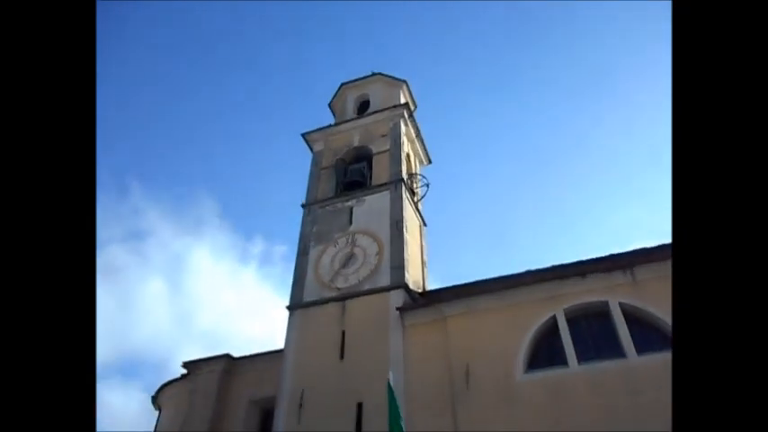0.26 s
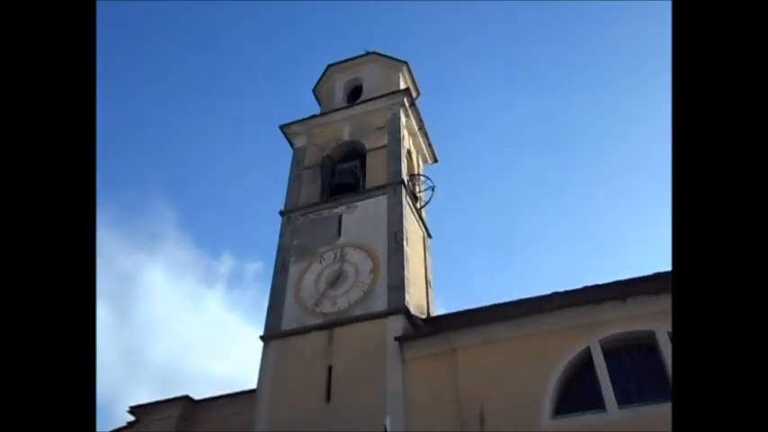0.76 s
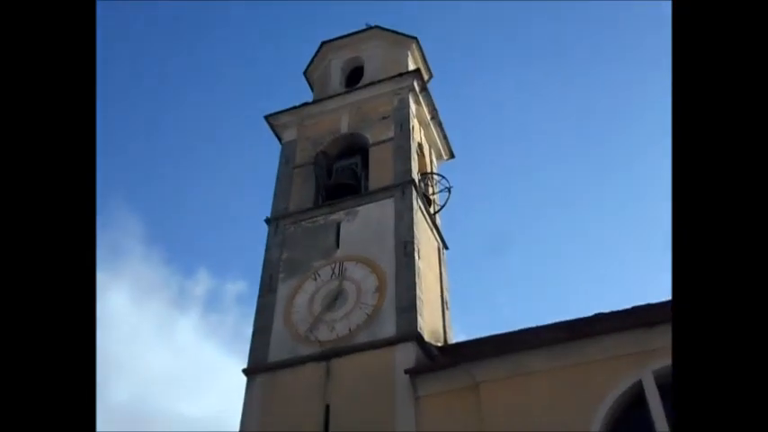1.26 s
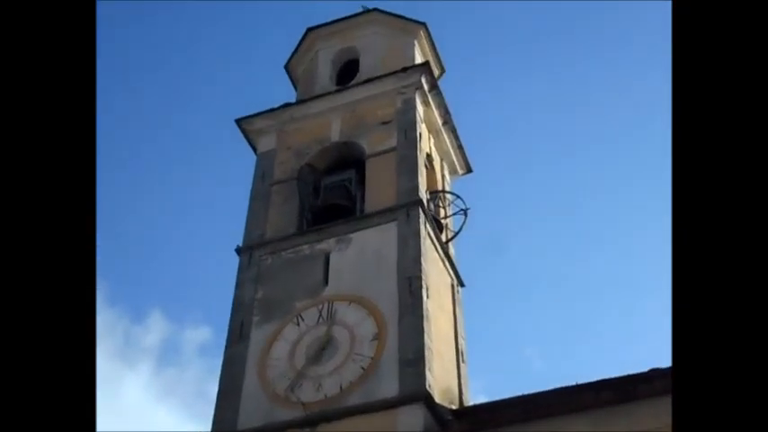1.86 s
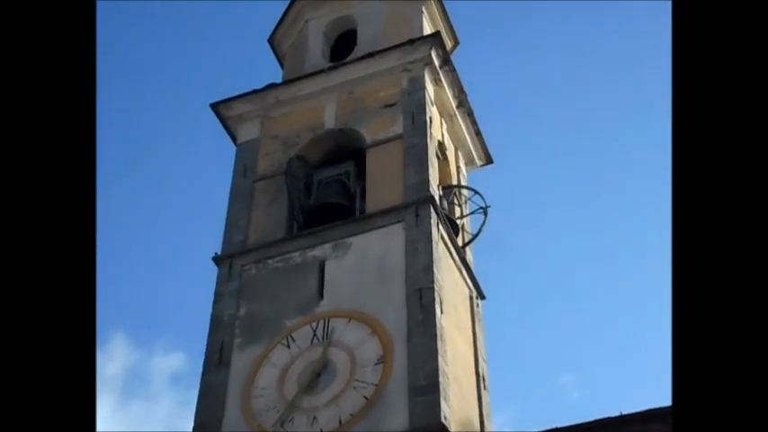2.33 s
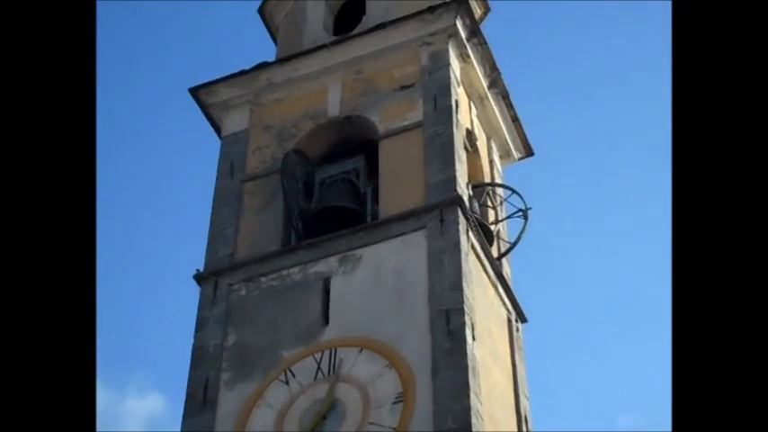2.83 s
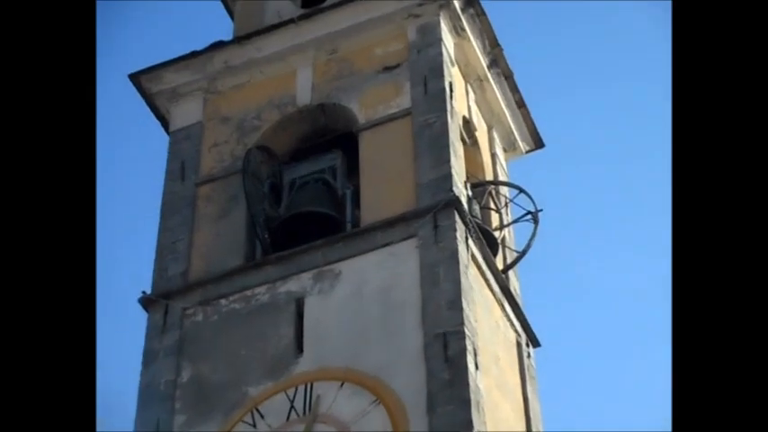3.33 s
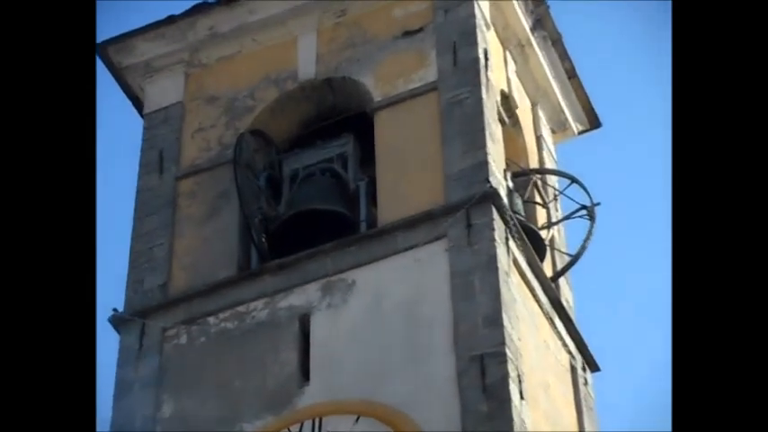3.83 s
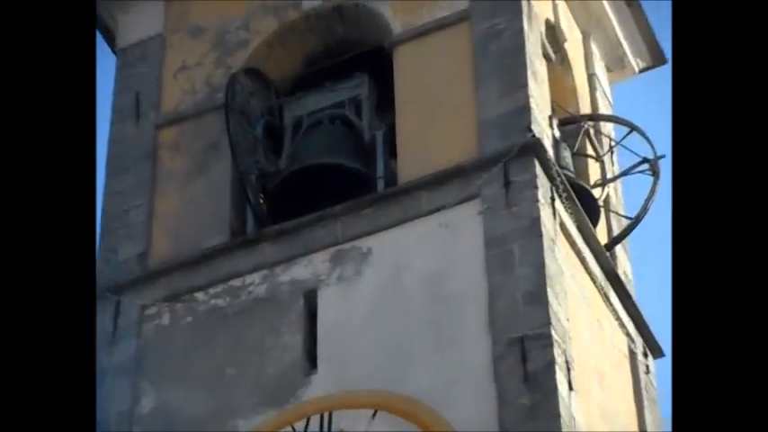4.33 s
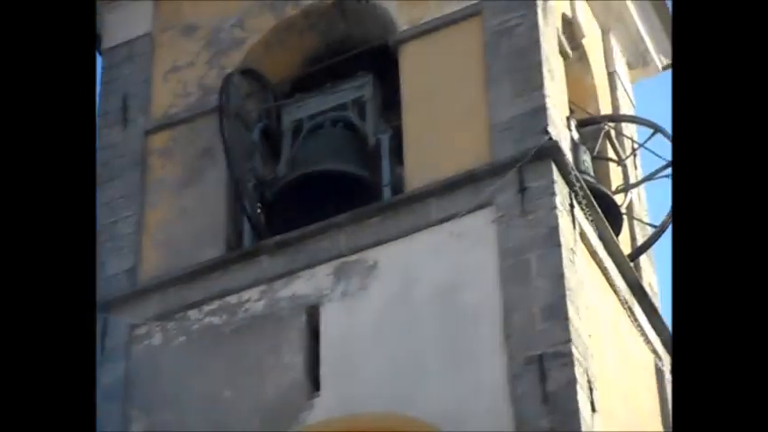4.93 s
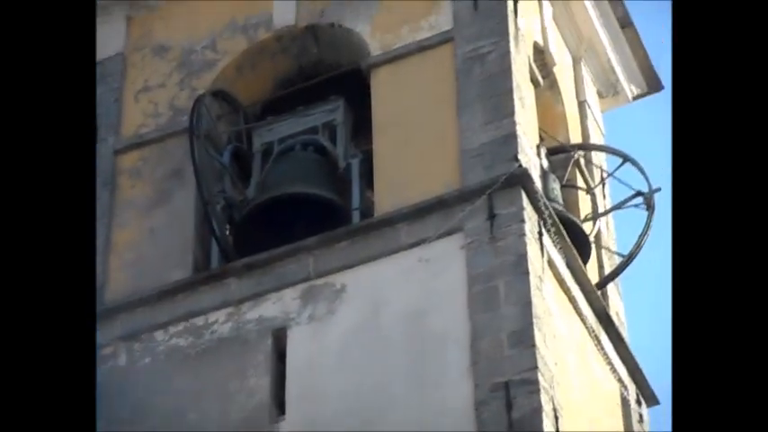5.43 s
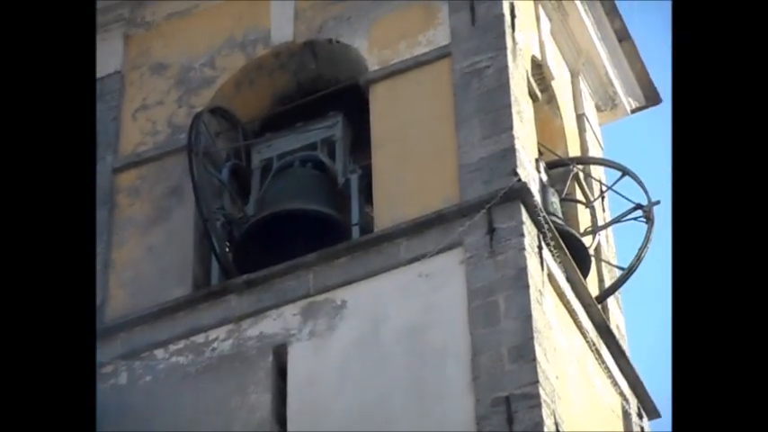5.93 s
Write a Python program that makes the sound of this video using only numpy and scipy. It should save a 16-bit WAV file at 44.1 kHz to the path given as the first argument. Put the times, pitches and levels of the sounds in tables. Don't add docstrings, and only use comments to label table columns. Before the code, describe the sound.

A small camera zoom motor whirs and rattles close up with irregular hollow ticks, stops, then a sharp plastic snap and fiddly finger clicks outdoors.

```python
import sys
import numpy as np
from scipy import signal
from scipy.fft import rfft, irfft, dct, next_fast_len
from scipy.io import wavfile
from scipy.ndimage import uniform_filter1d

SR = 44100
rng = np.random.default_rng(int(sys.argv[2]) if len(sys.argv) > 2 else 0)


def nominal_scale(level):
    x = np.asarray(level, float) / 20
    return 10 ** x


def generate_wav(signal):
    frames = np.transpose(np.atleast_2d(signal))
    scaled = np.clip(frames, -1, 1) * 32767
    pcm = np.round(scaled).astype(np.int16)
    wavfile.write(sys.argv[1], SR, pcm)


N = 272538


def level(x, db):
    return x * nominal_scale(db) / np.sqrt(np.mean(x ** 2))


def resonate(x, peaks):
    total = 0
    for k, (hz, width, db) in enumerate(peaks):
        b, a = signal.iirpeak(hz, hz / width, fs=SR)
        total = total + (-1) ** k * nominal_scale(db) * signal.lfilter(b, a, x)
    return total


def walk(rate):
    k = int(SR / rate)
    held = np.repeat(rng.standard_normal(N // k + 1), k)
    return 1.261 * uniform_filter1d(uniform_filter1d(held, k), k)[:N]


def add(out, s, y):
    i = int(s * SR)
    out[i:i + len(y)] += y[:N - i]


def ring(modes, chance, spread=.06, scatter_db=1.5):
    t = np.arange(4096) / SR
    y = 0
    for (hz, t60, db), louder, sharper in zip(modes, chance[:5], chance[5:]):
        tone = np.sin(2 * np.pi * hz * (1 + spread * sharper) * t)
        y = y + nominal_scale(db + scatter_db * louder) * tone * np.exp(-np.log(1000) * t / t60)
    y = -y * (1 - np.exp(-(t / 0.0003) ** 2))
    return y / np.max(np.abs(y))


def slam(modes, scrape_s):
    t = np.arange(4096) / SR
    y = 0
    for (hz, t60, db), phase_turns in zip(modes, 0.33 * rng.random(len(modes))):
        tone = np.sin(2 * np.pi * (hz * t + phase_turns))
        y = y + nominal_scale(db) * tone * np.exp(-np.log(1000) * t / t60)
    y = y * (1 - np.exp(-(t / scrape_s) ** 2))
    return y / np.max(np.abs(y))


# frequency in Hz, density in dB per Hz.
AIR_COLOUR = [(35, -33), (60, -15), (250, -9.5), (850, -2.5), (1150, -2), (1600, -7), (4500, -11),
              (10300, -28)]
# frequency in Hz, start in seconds, level in dB.
FAR_HUM = (250, 5.62, -75)
AIR_DB, AIR_SWELL_DB = -56, -1.02


def air():
    t = np.arange(N) / SR
    hz, db = np.transpose(AIR_COLOUR)
    f = np.maximum(np.fft.rfftfreq(N, 1 / SR), 1)
    colour = nominal_scale(np.interp(np.log(f), np.log(hz), db))
    hiss = irfft(rfft(rng.standard_normal(N)) * colour, N)
    swell = nominal_scale(AIR_DB + AIR_SWELL_DB * walk(1.38) + 0.46 * walk(5.3))
    hum_hz, hum_start_s, hum_db = FAR_HUM
    hum = np.sqrt(2) * nominal_scale(hum_db + 2.3 * walk(6.32)) * np.sin(2 * np.pi * hum_hz * t)
    return level(hiss, 0) * swell + hum * np.clip((t - hum_start_s) / 0.053, 0, 1)


# frequency in Hz, width in Hz, level in dB.
RUB_COLOUR = [(1500, 1000, -7.5), (2710, 380, 4.5), (4000, 1050, -1.5), (6200, 1450, -4.5), (7260, 500, -1),
              (8750, 600, -7.5)]
# touch in seconds, lift in seconds, level at the lift in dB.
STROKES = [
    (5.23, 5.477, -49.5),
    (5.69, 5.71, -64),
    (5.813, 5.93, -76),
    (5.98, 6.035, -56.5),
    (6.08, 6.2, -69),
]
PRESS_DB_PER_S, TOUCH_DB_PER_S, LIFT_DB_PER_S = 42, 280, 160


def rubbing():
    t = np.arange(N) / SR
    burstiness = np.minimum(rng.exponential(size=N), 6)
    grains = rng.standard_normal(N) * nominal_scale(3.7 * burstiness + 1.4 * walk(60))
    effort = 0
    for touch, lift, db in STROKES:
        press_db = db - PRESS_DB_PER_S * np.maximum(lift - t, 0)
        fade_db = TOUCH_DB_PER_S * np.maximum(touch - t, 0) + LIFT_DB_PER_S * np.maximum(t - lift, 0)
        effort = effort + nominal_scale(press_db - fade_db)
    return level(resonate(grains, RUB_COLOUR), -0.95) * effort


# frequency in Hz, width in Hz, level in dB.
SHELL = [(1870, 160, -4.5), (2300, 150, -0.5), (3120, 1200, -8.5), (4030, 680, -3), (4420, 310, -2.5),
         (5100, 1560, -10)]
SHELL_TOP = [(6800, 2500, -2.5), (7660, 1200, -0.5), (9100, 1200, -13.5)]
SHELL_LOW = [(344, 220, -9), (670, 170, -2), (820, 170, 8), (1170, 930, 9.5)]


def snap(db, hz, low_db, top_db, ms, noise, tail_db=-24, tail_s=0.006):
    t = np.arange(len(noise)) / SR
    span = t / (max(ms, .1) / 1000)
    after_rattle = nominal_scale(tail_db) * np.minimum(span, 1) * np.exp(-t / tail_s)
    burst = noise * (span * np.exp(-span ** 1.29) + after_rattle)
    spot = resonate(resonate(burst, SHELL), [(hz, 0.81 * hz, 0)])
    low = resonate(resonate(burst, SHELL_LOW), [(900, 600, 0)])
    top = resonate(resonate(burst, SHELL_TOP), [(7860, 3800, 0)])
    parts = (spot, 0), (low, low_db + 4.5), (top, top_db + 6.0)
    return sum(nominal_scale(db + rel_db) * part / np.max(np.abs(part)) for part, rel_db in parts)


# start in seconds, level in dB, centre in Hz,
# low part in relative dB, top part in relative dB.
CLICKS = [(4.345, -29, 2970, -34, -10), (4.7337, -44, 3100, -22, -12), (4.8862, -48, 2690, -1, -6),
          (4.956, -36, 3700, -25, -13.5), (4.982, -35.5, 2020, -24, -21), (5.0876, -25.5, 3340, -11, -30),
          (5.0982, -46, 1870, -11, 0), (5.141, -44, 1510, -14, -9), (5.144, -32.5, 5220, -28, -11),
          (5.154, -27.5, 4300, -4, -2), (5.233, -43.5, 2470, -9, -10), (5.3222, -42.5, 2580, -23, -7),
          (5.353, -42, 4040, -23, -10), (5.377, -42.5, 2650, -5, -17), (5.402, -35.5, 5600, -26, -1),
          (5.466, -38.5, 2680, -13, -13), (5.661, -41, 1500, -6, -14), (5.674, -52, 6000, -25, -6),
          (5.6819, -35, 3000, -10, -6.5), (5.733, -56, 6000, -25, -8), (5.777, -56, 6500, -25, -12),
          (5.958, -52, 6500, -25, -2), (6.008, -45, 3500, -8, -13), (6.036, -45, 3000, -15, -10),
          (6.041, -25.5, 3250, -14.5, -19)]
CHATTER_MS = 0.59


def clicks():
    out = np.zeros(N)
    for (s, *row), noise in zip(CLICKS, rng.standard_normal((len(CLICKS), 2048))):
        add(out, s - .0003, snap(*row, CHATTER_MS, noise))
    return out


# frequency in Hz, 60 dB decay in seconds, level in dB.
LEVER = [(259, 0.05, -36), (616, 0.037, -33), (810, 0.028, -19), (1130, 0.010, -1.5), (1605, 0.0093, -2.5),
         (2000, 0.0086, -14), (2864, 0.0088, 3), (3145, 0.0076, 9.5), (4470, 0.0063, 10), (5510, 0.0069, 3),
         (6920, 0.0056, 2), (8170, 0.0054, -5), (8970, 0.0056, -9), (10010, 0.0057, -9)]
CASE = [(1500, .06, -34), (2415, 0.06, -27), (2500, .06, -36), (2830, 0.066, -36), (4020, 0.064, -48),
        (4530, 0.083, -46), (7750, 0.045, -34.5), (6280, 0.0067, -12), (7370, 0.0065, -9)]
CATCH = [(1870, 0.0087, -14), (2580, 0.013, -6.5), (3040, 0.018, -9.5), (3790, 0.0055, -1),
         (4500, 0.0062, 2), (4810, 0.024, -16.5), (5360, 0.0056, 4), (6280, 0.0049, 2), (7200, 0.0047, -1),
         (8350, 0.0045, -3), (9400, 0.0045, -6)]
LEVER_S, LEVER_DB = 4.8356, -3
CATCH_S, CATCH_DB = 3.9106, -16


def lever():
    out = np.zeros(N)
    add(out, LEVER_S, nominal_scale(LEVER_DB) * slam(LEVER + CASE, 0.0017))
    crack = snap(-14.5, 3340, -19.5, -15, 1.95, rng.standard_normal(4096), tail_db=-29.5, tail_s=0.0092)
    add(out, LEVER_S, crack)
    thud = ring([(60, 0.058, 3), (140, .04, -9)], rng.standard_normal(10))
    add(out, LEVER_S + 0.00264, nominal_scale(-38.0) * thud)
    add(out, CATCH_S, nominal_scale(CATCH_DB) * slam(CATCH, 0.00077))
    return out


# frequency in Hz, 60 dB decay in seconds, level in dB.
HOLLOW = [(638, 0.01, -2), (854, 0.016, -1), (1054, 0.011, 9), (1517, 0.0067, 7)]
WALL = [(2300, 0.0036, 12), (1980, 0.0094, -9), (2680, 0.0095, -0.5), (3170, 0.0071, 0),
        (3450, 0.0052, -2.5)]
THUMP = [(106, 0.05, -11), (168, 0.024, -2), (321, 0.015, 5)]
PING = [(2600, 0.0081, 3), (2250, 0.0067, -4), (3050, 0.0054, -12), (1050, 0.01, -8), (1610, .006, -15)]
# start in seconds, hollow knock in dB, wall in relative dB, hollow in Hz, wall in Hz.
SLIPS = [(0.358, -37.5, 4, 1050, 2120), (0.549, -30.5, -7.5, 970, 2000), (0.657, -36.5, 5.5, 1100, 2220),
         (0.822, -35, 1, 1060, 2150), (0.982, -38.5, 12, 960, 2400), (1.126, -31, 5, 970, 2250),
         (1.243, -30.5, 5, 1030, 2360), (1.312, -34.5, 5.5, 1090, 2250), (1.401, -31, 2, 1070, 2310),
         (1.538, -30.5, 1.5, 1025, 2250), (1.633, -33, 3.5, 1040, 2370), (1.738, -28.5, -1, 1090, 2340),
         (1.815, -28.5, -1.5, 990, 2390), (1.86, -29.5, -0.5, 1065, 2300), (1.897, -29.5, 0, 1110, 2300),
         (1.949, -38, -3, 1050, 2400), (2.027, -34, -1.5, 1210, 2250), (2.078, -36, 2.5, 1060, 2250),
         (2.143, -36, -1, 1060, 2400), (2.19, -35.5, -2, 990, 2400), (2.441, -31, 1.5, 1010, 2300),
         (2.587, -31, -0.5, 860, 2250), (2.688, -29.5, -4.5, 910, 2550), (2.78, -29, -9, 940, 2550),
         (2.853, -29, -4.5, 905, 2500), (2.902, -32.5, -6, 880, 2570), (2.943, -35.5, -11, 900, 2500),
         (4.559, -29.5, -5, 820, 2240)]
# start in seconds, hollow knock in dB, wall in relative dB, thump in dB.
KNOCKS = [(0.076, -43.5, -19, -70), (0.579, -40, -15, -69), (0.608, -41.5, -14, -75), (0.635, -45, -3, -76),
          (0.698, -40, -16, -67), (0.745, -41.5, -13, -78), (2.609, -38, -8, -72), (2.974, -37, -19, -65),
          (3.464, -40.5, -0.5, -59), (3.638, -33, -25, -53), (3.767, -35, -19, -56), (3.786, -37, -16, -76),
          (3.832, -39, -3, -66), (3.847, -45, -15, -76), (3.885, -37.5, -11, -53), (3.964, -43, -9, -80),
          (4.039, -56, -6, -57), (4.309, -44, 2, -64), (4.364, -38, -4, -62)]
# start in seconds, level in dB.
REBOUNDS = [(0.3742, -35), (0.5647, -35), (.6692, -32.5), (0.8371, -36.5), (.9986, -43), (1.1429, -41),
            (1.2579, -39.5), (1.325, -43), (1.4145, -47), (1.5502, -40), (2.0403, -43), (2.0939, -48),
            (2.7074, -36.5), (2.7959, -41), (2.871, -44), (2.9178, -31), (2.9549, -34), (4.578, -33)]
# start in seconds, level in dB.
PINGS = [
    (3.0828, -23),
    (4.172, -23.5),
]
# time in seconds, thump in dB.
JOLT_DB = [(.3, -62.5), (.95, -57), (1.7, -55), (2.45, -58), (2.6, -61.5), (4.6, -63)]
REBOUND_WALL_DB, REBOUND_THUMP_DB = -14, -66
WALL_HZ, WALL_RISE_HZ_PER_S, WALL_TOP_HZ = 2060, 240, 2640


def barrel():
    def wall_hz_at(s):
        return min(WALL_HZ + WALL_RISE_HZ_PER_S * s, WALL_TOP_HZ)

    out = np.zeros(N)
    hollow_hz, bright_hz = HOLLOW[2][0], WALL[0][0]
    blows = []
    for s, db, wall_db, low_hz, hz in SLIPS:
        blows.append((s, db, wall_db, np.interp(s, *np.transpose(JOLT_DB)), low_hz, hz))
    for row in KNOCKS:
        blows.append((*row, hollow_hz, wall_hz_at(row[0])))
    for s, db in REBOUNDS:
        blows.append((s, db, REBOUND_WALL_DB, REBOUND_THUMP_DB, 0.922 * hollow_hz, wall_hz_at(s)))
    chances = rng.standard_normal((len(blows), 3, 10))
    for (s, db, wall_db, thump_db, low_hz, hz), chance in zip(blows, chances):
        cavity_modes = np.multiply(HOLLOW, [low_hz / hollow_hz, 1, 1])
        wall_modes = np.multiply(WALL, [hz / bright_hz, 1, 1])
        cavity = ring(cavity_modes, chance[0], spread=0.039, scatter_db=1.0)
        wall = ring(wall_modes, chance[1], spread=0.037)
        thump = ring(THUMP, chance[2])
        add(out, s + 0.001874, -nominal_scale(db + 3) * cavity - nominal_scale(thump_db + 11.5) * thump)
        add(out, s + 0.001819, nominal_scale(db + wall_db + 6.5) * wall)
    for (s, db), chance in zip(PINGS, rng.standard_normal((len(PINGS), 10))):
        add(out, s, nominal_scale(db) * ring(PING, chance, spread=0.013))
    return out


# frequency in Hz, width in Hz, level in dB.
HOUSING = [(1046, 510, -15), (1764, 142, -2.5), (2335, 700, -1.5), (2722, 484, -0.5)]
FRAME = [(3050, 560, -1), (3700, 990, -2.5), (4230, 180, -2)]
PINION = [(4750, 450, 0)]
GEAR_RING = [(5850, 400, -2), (6300, 500, 0), (6800, 600, -2.5), (7350, 400, -7)]
TOP_RING = [(7700, 370, -1), (8200, 530, 2), (8790, 690, -1), (10100, 240, -19.5)]
SEGMENT_DB = [0, -1, -3.5, -1.5, -2.5, -3.5]
# time in seconds, frequency in Hz.
PINION_HZ = [
    (0.02, 4754),
    (2.29, 4690),
    (2.53, 4790),
    (4.58, 4654),
]
COMMUTATIONS_PER_S, MOTOR_STOP_S = 211.3, 4.608
HOUSING_DB, GEAR_DB = -52, -54.5
TOP_DB, TOP_FADE_DB_PER_S = -55, 0.93
LIMP_FROM_S, LIMP_TO_S, LIMP_EASE_S = 0.67, 3.5, .4


def motor():
    t = np.arange(N) / SR
    steps = np.cumsum(COMMUTATIONS_PER_S * (1 + .004 * walk(12) + .006 * walk(3))) / SR
    step = steps.astype(int)
    segment, turn = step % len(SEGMENT_DB), step // len(SEGMENT_DB)
    since = np.arange(N) - np.searchsorted(step, step)
    strike = since == 0
    size = nominal_scale(np.array(SEGMENT_DB)[segment] + .7 * rng.standard_normal(step[-1] + 1)[step])

    def rattle(decay, steady, second, tick, memory=.55):
        fresh = rng.standard_normal((turn[-1] + 1, len(SEGMENT_DB), 512))
        kept = signal.lfilter([np.sqrt(1 - memory ** 2)], [1, -memory], fresh, axis=0)
        chatter = kept[turn, segment, since]
        gate = np.exp(-(steps % 1) / decay) + second * np.exp(-((steps - .5) % 1) / decay)
        return tick * size * strike + (steady + size * uniform_filter1d(gate, size=31)) * chatter

    housing = resonate(rattle(decay=.5, steady=.3, second=.8, tick=0), HOUSING)
    frame = resonate(rattle(decay=.12, steady=.09, second=.15, tick=1.1), FRAME)
    gear = resonate(rattle(decay=.11, steady=.13, second=.12, tick=.7), GEAR_RING)
    top = resonate(rattle(decay=.12, steady=.11, second=.15, tick=.8), TOP_RING)

    bite = rng.standard_normal((step[-1] + 1, 2))[step].T
    limp = np.clip(np.minimum(t - LIMP_FROM_S, LIMP_TO_S - t) / LIMP_EASE_S + .5, 0, 1)
    alternate = .55 + (.15 + .3 * limp) * (-1) ** step
    tooth = alternate * np.sign(bite[0]) * nominal_scale(1.2 * bite[1]) * strike
    grind = .06 * rattle(decay=.1, steady=.3, second=.1, tick=0)
    pinion = resonate(resonate(tooth + grind, PINION), [(4750, 900, 0)])
    drift_hz = np.interp(t, *np.transpose(PINION_HZ)) - PINION[0][0]
    shift = np.exp(2j * np.pi * np.cumsum(drift_hz) / SR)
    pinion = np.real(signal.hilbert(pinion, next_fast_len(N))[:N] * shift)

    frame = frame * (1 + 0.09 * limp * uniform_filter1d((-1.) ** step, size=41))
    housing = level(resonate(housing, [(1883, 4900, 0)]), 0)
    housing = housing + level(resonate(frame, [(3630, 1800, 0)]), -0.1)
    gear = resonate(gear, [(6130, 2800, 0)])
    top = resonate(top, [(8300, 2800, 0)])
    housing = housing - .6 * resonate(housing, [(4800, 800, 0)])
    gear = gear - .6 * resonate(gear, [(4800, 800, 0)])
    gear = level(gear, 0) + level(pinion, -1.5)

    whirr = level(housing, 0.17) * nominal_scale(HOUSING_DB) + level(gear, 0.7) * nominal_scale(GEAR_DB)
    whirr = whirr + level(top, 0.31) * nominal_scale(TOP_DB - TOP_FADE_DB_PER_S * t)
    whirr = whirr - 0.092 * resonate(whirr, [(5560, 840, 0.0059)])
    return whirr * np.clip((MOTOR_STOP_S - t) / 0.0022, 0, 1)


def scene():
    return (air() + rubbing() + clicks() + lever() + barrel() + motor())[None]


# centre in seconds,
# threshold over the local mean in dB, treble lost above in Hz, edge steepness as a factor.
STARVED = [(.247, 5.5, 11000, 1.5), (.439, 4.5, 11000, 1.4), (1.034, 4.5, 11000, 1.5),
           (2.314, 3.5, 11000, 1.4), (3.253, 4.5, 11000, 1.3), (3.68, 4.5, 11000, 1.4),
           (4.213, 4.5, 11000, 1.4), (4.385, 4, 11000, 1.6), (4.854, 4, 5000, 4), (4.936, 5, 11000, 1.3),
           (5.172, 5, 7500, 2), (5.282, 5, 11000, 1.3), (5.793, 4, 5000, 1.15)]


def starve(x, size=1152):
    y = x.copy()
    window = np.sin(np.pi * (np.arange(size) + .5) / size)
    hz = np.arange(size) * SR / 2 / size
    for s, over_db, treble_hz, edge in STARVED:
        treble = hz > treble_hz
        share = np.where(treble, 1, min(.6 + .07 * over_db, 1))
        i = int(s * SR) - size // 2
        lines = dct(x[i:i + size] * window, type=4, norm="ortho")
        mean = np.sqrt(uniform_filter1d(lines ** 2, size=301))
        lost = lines * (np.abs(lines) < mean * nominal_scale(over_db + 6 * treble))
        flat = np.minimum(edge * window, 1 / window)
        overshoot = window * dct(.9 * (lines - lost), type=4, norm="ortho")
        y[i:i + size] += overshoot - flat * dct(share * lost, type=4, norm="ortho")
    return y


def roll_off(x):
    return signal.sosfilt(signal.butter(12, 10940, fs=SR, output="sos"), x)


def record(dry):
    thin = signal.sosfilt(signal.butter(1, 140, "high", fs=SR, output="sos"), dry)
    top_cut = signal.ellip(10, .3, 95, 10370, fs=SR, output="sos")
    mix = signal.sosfilt(top_cut, starve(thin[0]))
    return roll_off(mix[None])


dry = scene()
out = record(dry)
generate_wav(out)
```